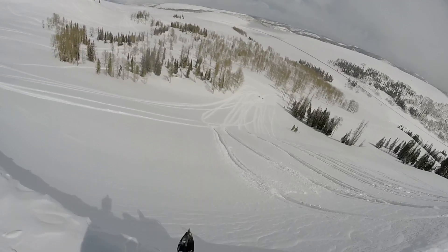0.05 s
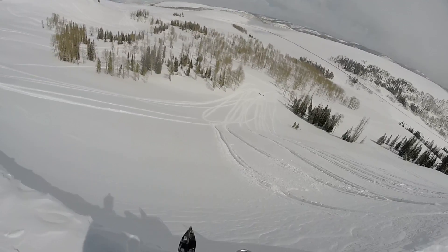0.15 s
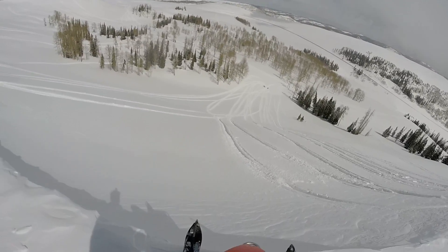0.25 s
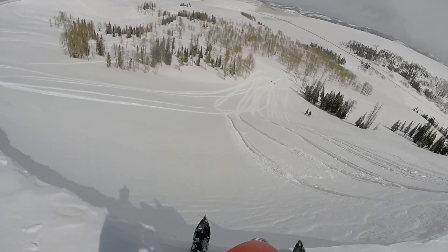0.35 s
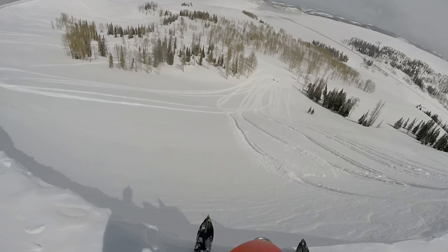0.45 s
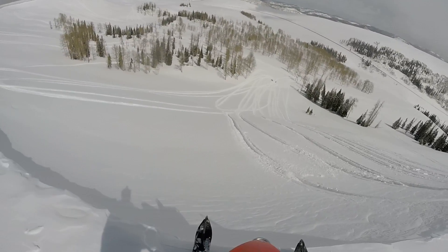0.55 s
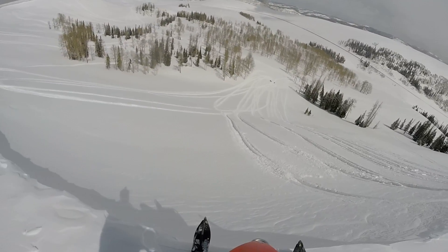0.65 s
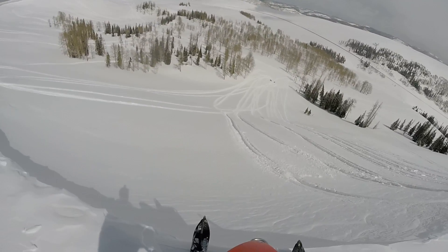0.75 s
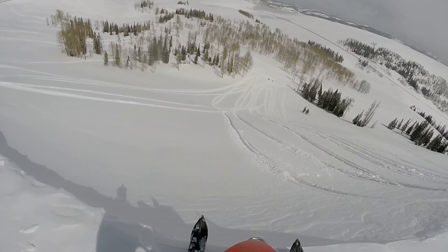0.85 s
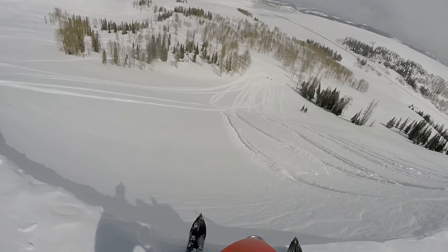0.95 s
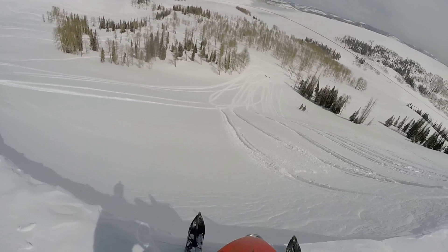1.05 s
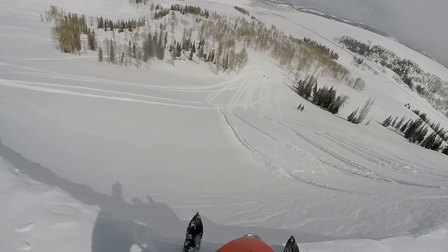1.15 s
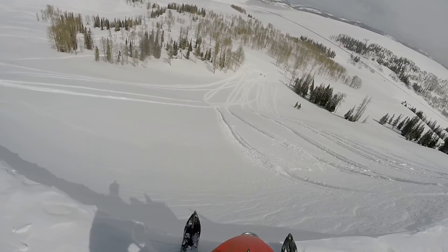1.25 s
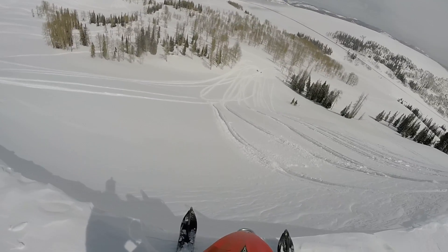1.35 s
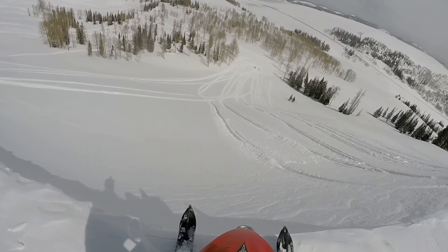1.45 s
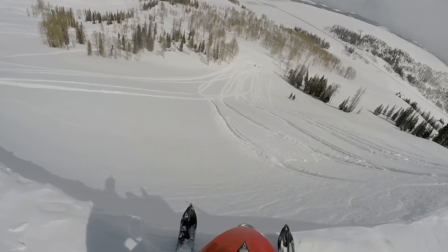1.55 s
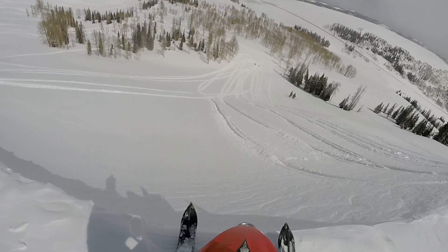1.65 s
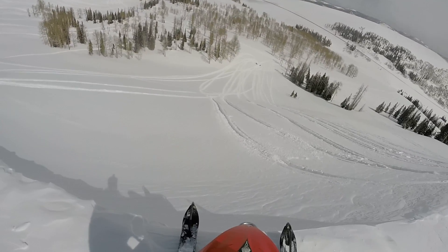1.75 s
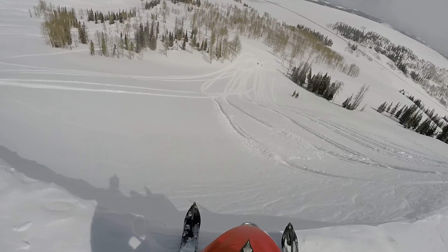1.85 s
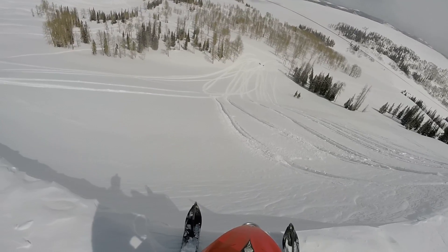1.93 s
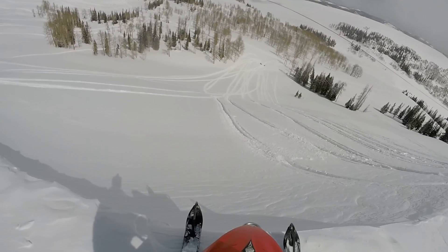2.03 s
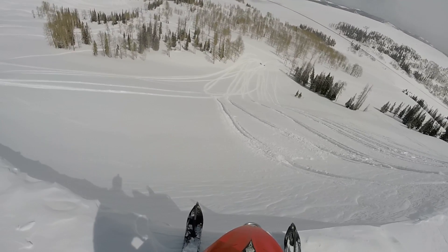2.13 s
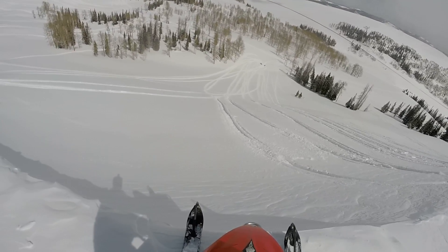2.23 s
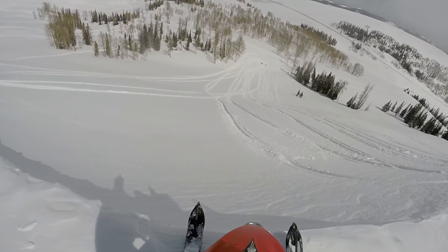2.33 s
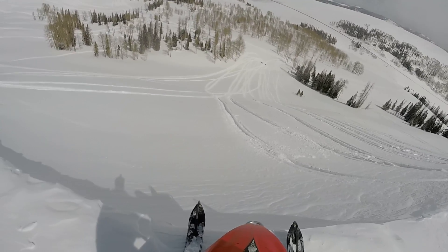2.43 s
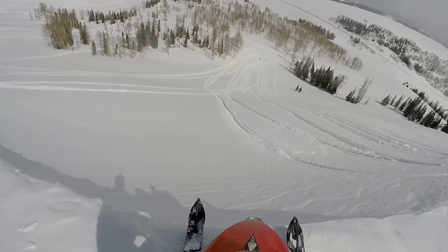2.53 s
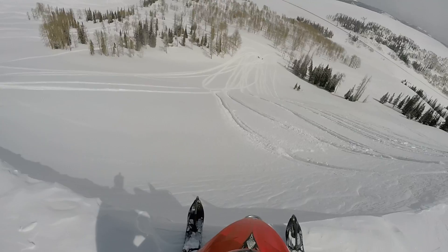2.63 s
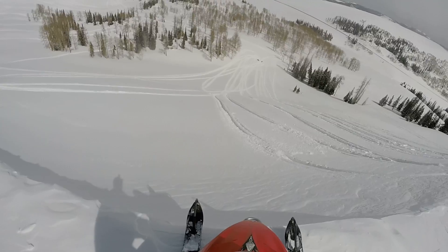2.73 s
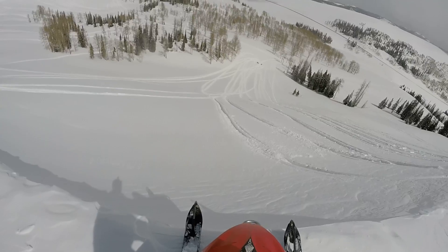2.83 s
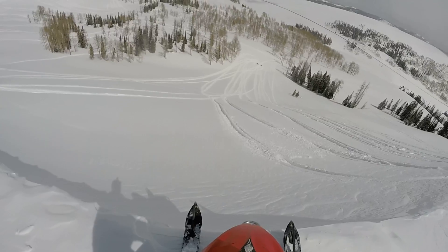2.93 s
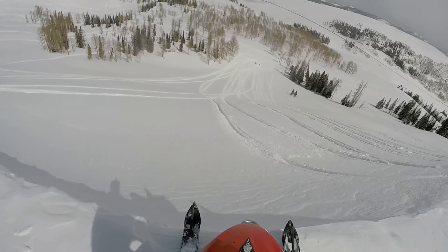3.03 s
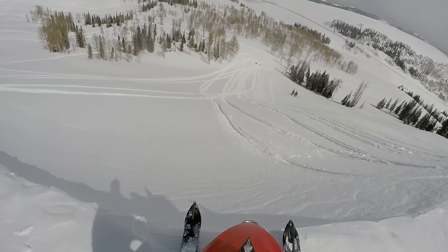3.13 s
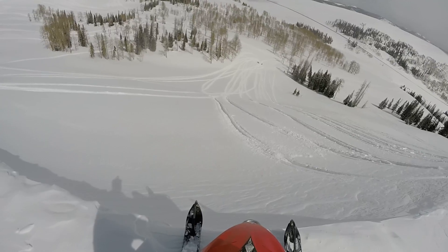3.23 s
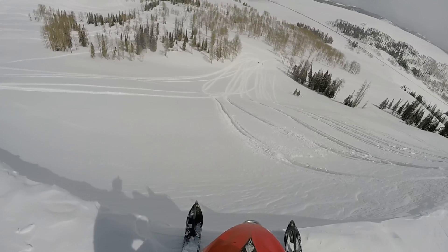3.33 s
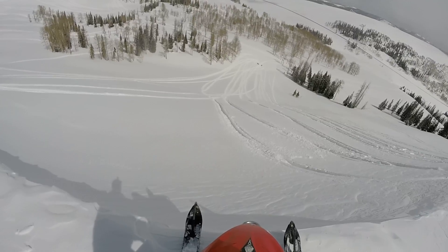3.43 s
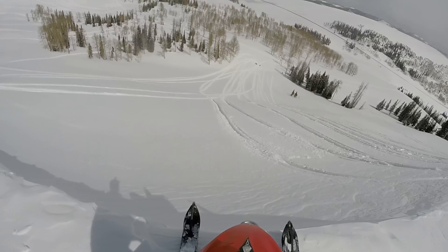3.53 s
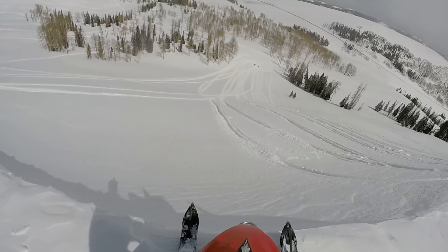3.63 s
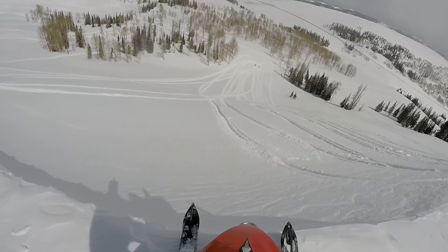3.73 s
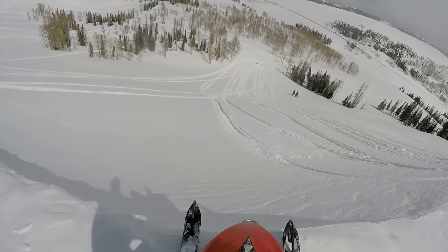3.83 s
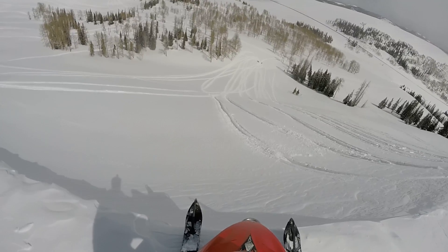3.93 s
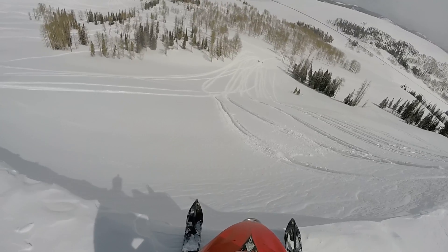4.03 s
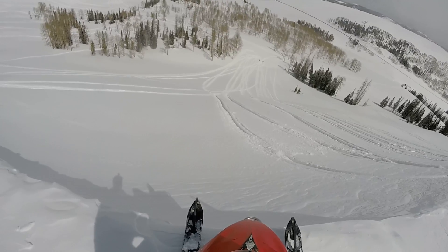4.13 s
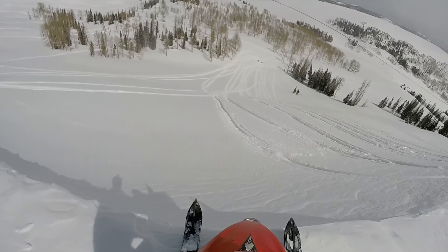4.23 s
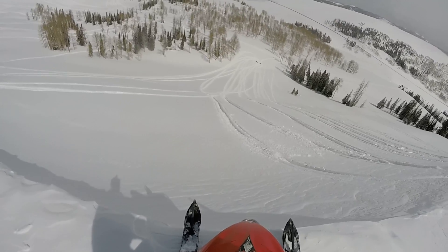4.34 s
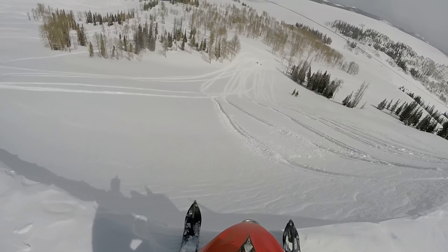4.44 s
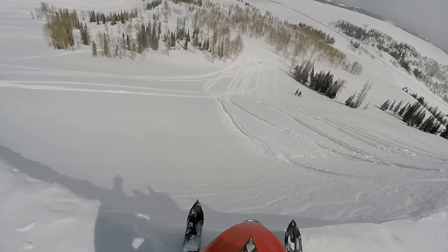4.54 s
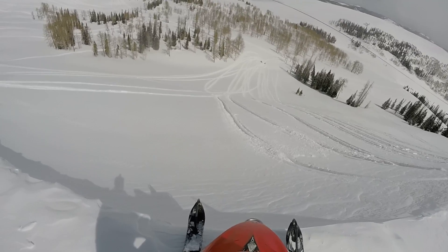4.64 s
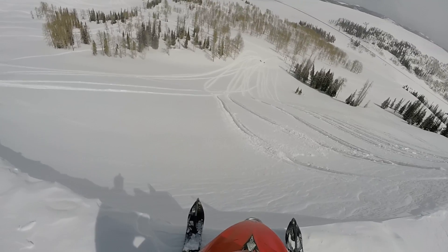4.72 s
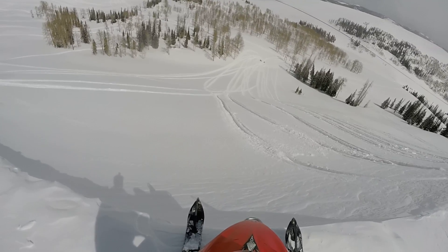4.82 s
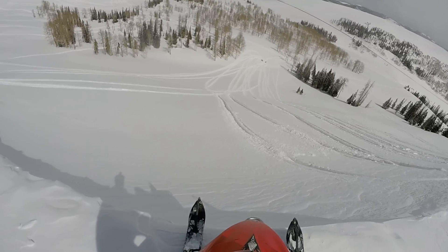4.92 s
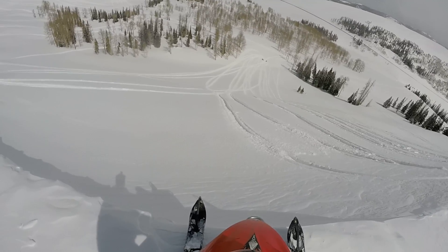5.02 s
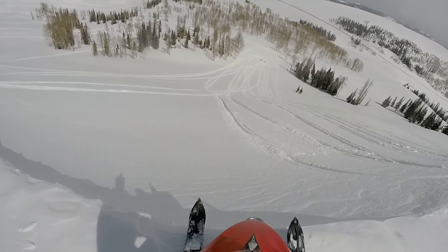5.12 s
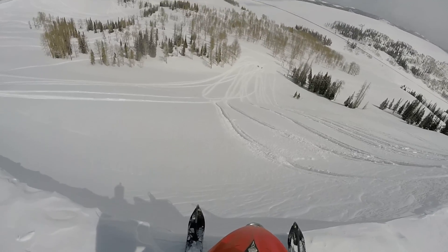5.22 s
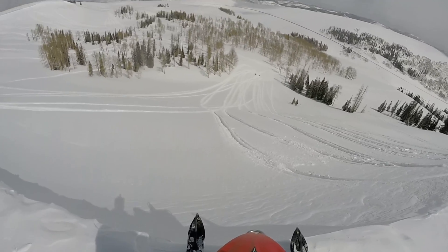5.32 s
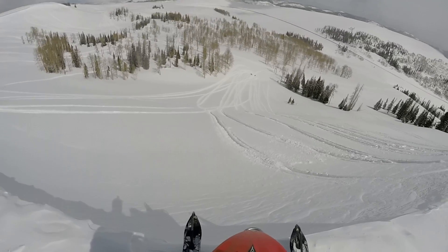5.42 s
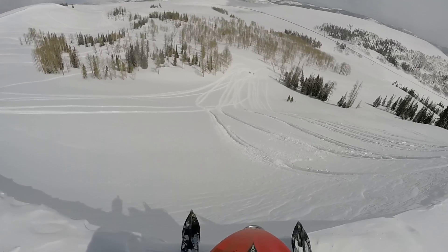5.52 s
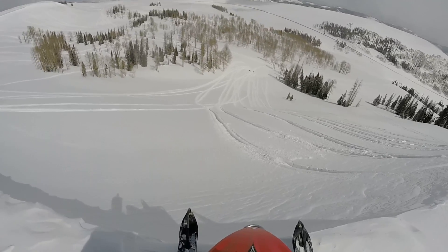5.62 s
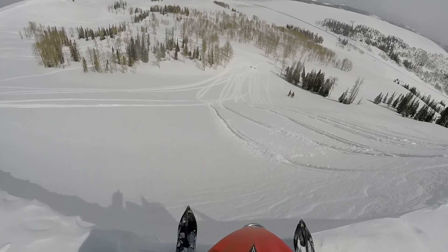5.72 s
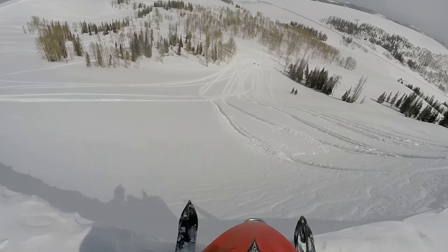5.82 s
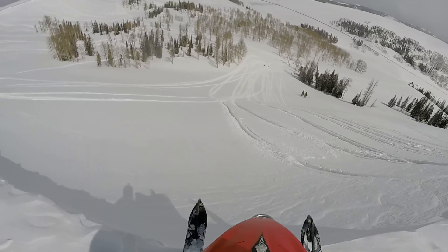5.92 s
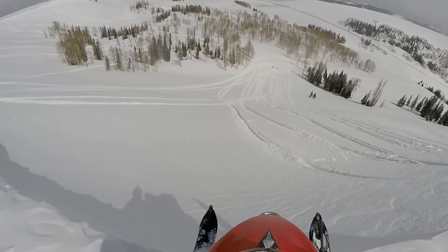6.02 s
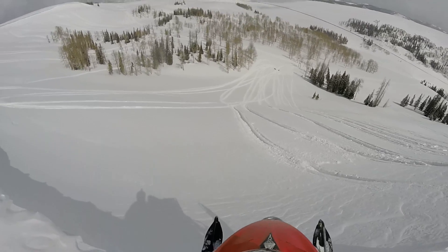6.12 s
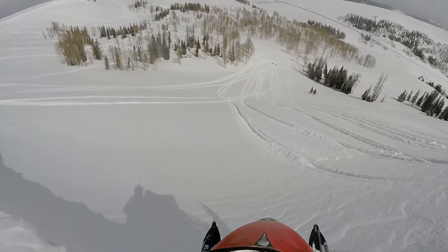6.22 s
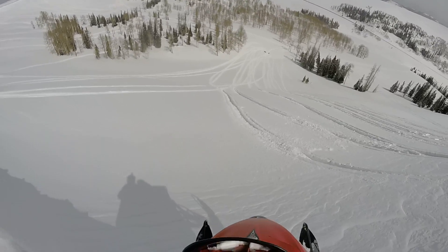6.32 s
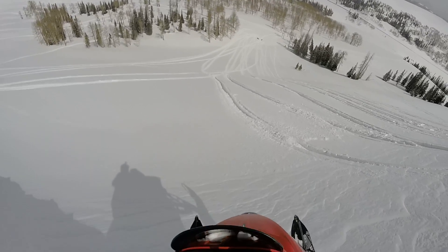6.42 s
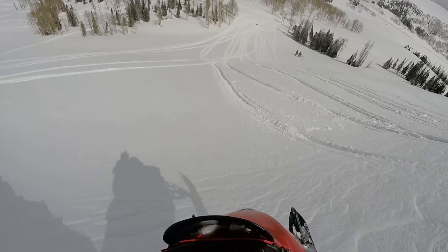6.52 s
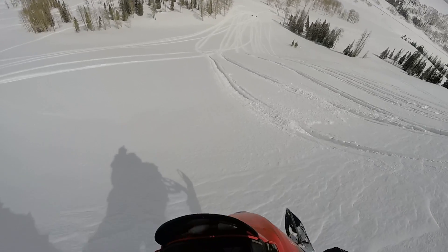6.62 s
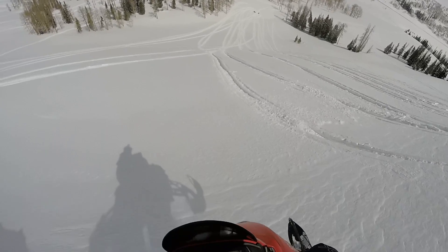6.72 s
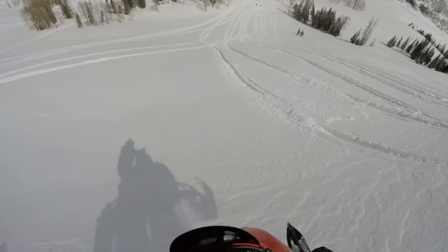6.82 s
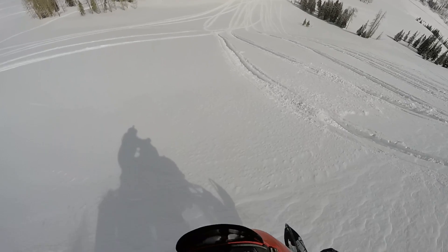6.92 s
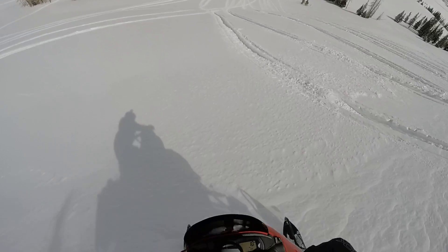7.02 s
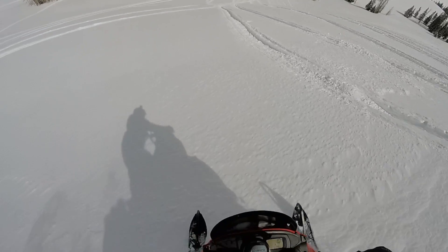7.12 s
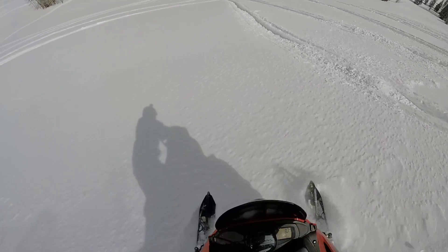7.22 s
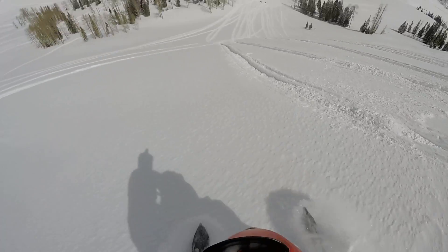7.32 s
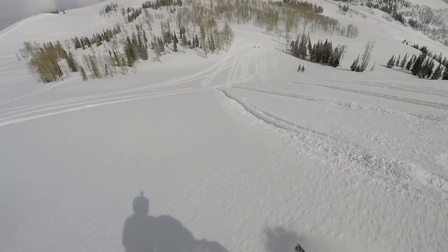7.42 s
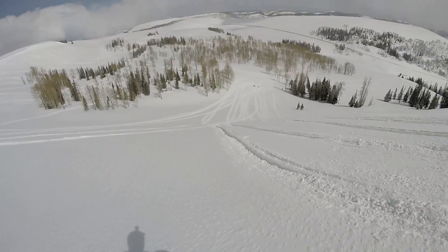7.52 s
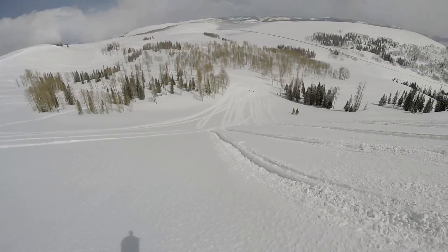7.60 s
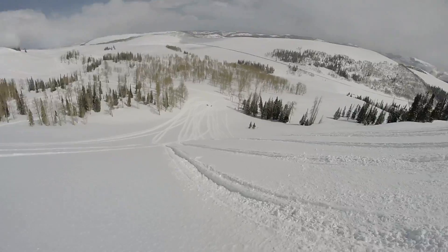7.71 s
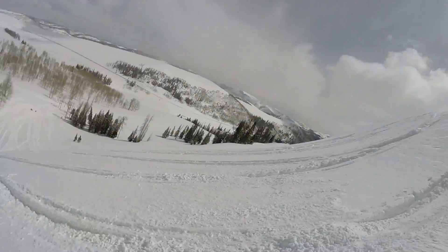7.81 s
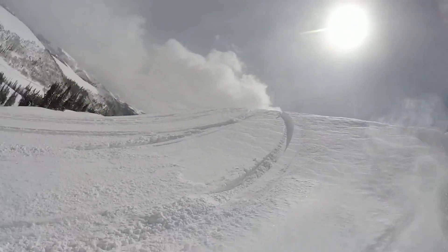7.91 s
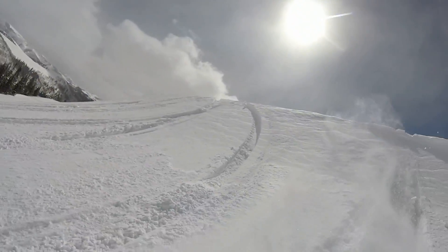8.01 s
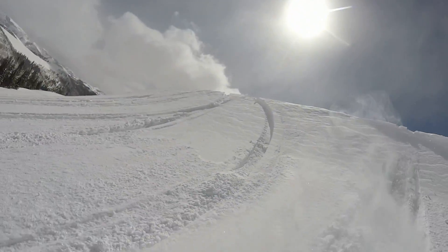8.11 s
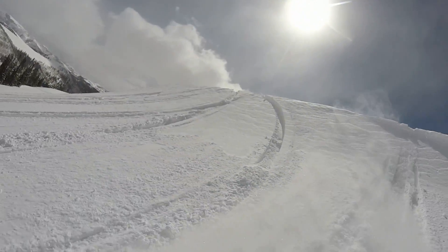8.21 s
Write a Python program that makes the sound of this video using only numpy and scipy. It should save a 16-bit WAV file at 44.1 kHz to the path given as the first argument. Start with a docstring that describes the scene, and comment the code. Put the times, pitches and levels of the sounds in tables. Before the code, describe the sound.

A snowmobile engine hunts at idle outdoors on snow, each catch barking briefly before slowing, with faint wind rumble and a few light taps. It then revs up twice into a louder, buzzing roar as wind thumps the rider's microphone. When the throttle closes, a clatter of sharp plastic knocks and rubs right at the microphone dominates, with low exhaust burble and the whir of the track beneath.

```python
"""A two-stroke snowmobile hunts at idle on a snowy slope, heard from the rider's camera: each catch
pops, barks and rasps, then friction slows the crank. Wind rumbles; the camera takes a few light taps.
From 5.3 s the machine pulls away in two main bursts of throttle, its firings booming in the pipe and
ringing the panels, while gusts buffet the microphone. At 6.8 s the throttle shuts and it coasts downhill,
exhaust burbling and track whirring, as the camera's plastic housing is shoved, knocked and rubbed."""
import sys
import numpy as np
from scipy import signal
from scipy.fft import rfft, irfft, next_fast_len
from scipy.io import wavfile
from scipy.ndimage import map_coordinates

SR = 44100
rng = np.random.default_rng(int(sys.argv[2]) if len(sys.argv) > 2 else 0)


def transcribe(signal):
    """Save signal, clipped to [-1, 1], as a 16-bit WAV file at the path in sys.argv[1]."""
    frames = np.atleast_2d(signal).T
    limited = np.clip(frames, -1, 1)
    pcm = np.round(limited * 32767).astype(np.int16)
    wavfile.write(sys.argv[1], SR, pcm)


N = 364266
T = np.arange(N) / SR


def amp(db):
    """Decibels to gain."""
    return 10 ** (np.asarray(db) / 20)


def unit(x):
    """Scale to rms 1."""
    return x / np.sqrt(np.mean(x ** 2) + 1e-20)


def steady(x):
    """Scale to rms 1 moment by moment."""
    power = signal.fftconvolve(x ** 2, np.hanning(4000) / 2000, "same")
    return x / np.sqrt(np.abs(power) + 1e-12)


def curve(rows):
    """Straight lines through (s, value) rows."""
    return np.interp(T, *np.transpose(rows))


def swells(rows):
    """A bell of gain for each (centre s, half length s, dB) row."""
    return sum(amp(db) * np.exp(-((T - s) / half) ** 2) for s, half, db in rows)


def wobble(knots_per_s):
    """A smooth random curve."""
    return map_coordinates(rng.standard_normal(int(N * knots_per_s / SR) + 4), [T * knots_per_s])


def colour(x, points, peaks=()):
    """Minimum-phase filter from (Hz, dB) points and (Hz, width Hz, dB) peaks."""
    size = next_fast_len(N + SR // 2, True) // 2 * 2
    hz = np.fft.rfftfreq(size, 1 / SR)
    point_hz, point_db = np.transpose(points)
    db = np.interp(np.log(hz + 1), np.log(point_hz + 1), point_db)
    db += sum(lift / (1 + (2 * (hz - centre) / width) ** 2) for centre, width, lift in peaks)
    cepstrum = irfft(np.log(amp(db) + 1e-6), size)
    cepstrum[1:size // 2] *= 2
    cepstrum[size // 2 + 1:] = 0
    return irfft(rfft(x, size) * np.exp(rfft(cepstrum)), size)[:N]


def noise(points, peaks=()):
    """Coloured noise of rms 1."""
    return unit(colour(rng.standard_normal(N), points, peaks))


# Catches of the idle. Each row: start in seconds, end in seconds, cap on firing rate in Hz, boost in dB.
CATCHES = [(.342, .537, 81, 5.5), (1.001, 1.054, 51, 4.5), (1.12, 1.235, 69, 4), (1.665, 1.82, 59, 5),
           (2.13, 2.41, 81, 4.8), (2.865, 3.01, 78, 4.5), (3.405, 3.65, 86, 4.8), (4.15, 4.21, 52, 2),
           (4.257, 4.36, 71, 3.8), (4.66, 4.81, 77, 3.5), (5.3, 5.4, 44, 4.5)]
# Pulling away. Each row: time in seconds, firing rate in Hz.
PULL_SPEED = [(5.45, 69.9), (5.554, 99.6), (5.694, 138.2), (5.788, 155.7), (5.88, 167.3), (5.938, 166.3),
              (6.124, 140.0), (6.198, 142.1), (6.368, 162.6), (6.442, 166.4), (6.678, 161.6), (6.76, 152.3)]
PULL_S, SHUT_S = 5.3, 6.78


def crank():
    """Firing rate in Hz and running count: catches lift the idle, friction slows it; pull; run-down."""
    pickup_hz_per_s, friction_hz_per_s, spin_on_s = 178, 71, 0.02
    rest_hz, run_down_s = 47.63, 0.58
    hunting = 66 - friction_hz_per_s * T
    for start, end, cap_hz, _ in CATCHES:
        climb = np.interp(start, T, hunting) + pickup_hz_per_s * (np.minimum(T, end + spin_on_s) - start)
        fall = friction_hz_per_s * np.maximum(T - end - spin_on_s, 0)
        hunting = np.where(T < start, hunting, np.minimum(climb, cap_hz) - fall)
    pulling = curve([(PULL_S, np.interp(PULL_S, T, hunting)), *PULL_SPEED])
    riding = rest_hz + (pulling - rest_hz) * np.exp(-np.maximum(T - SHUT_S, 0) / run_down_s)
    rate_hz = np.maximum(np.where(T < PULL_S, hunting, riding), 20)
    return rate_hz, np.cumsum(rate_hz * (1 + 0.002 * wobble(25))) / SR


def firings(cycles, rough, jitter):
    """One band-limited pulse per firing; roughness scatters strength and timing."""
    at = np.interp(np.arange(1, cycles[-1]), cycles, np.arange(N))
    uneven = rough[at.astype(int)]
    slip, surge = rng.standard_normal((len(at), 2)).T
    at = np.clip(at + jitter * SR * uneven * slip, 8, N - 10)
    taps = at.astype(int)[:, None] + np.arange(-7, 9)
    offset = taps - at[:, None]
    shape = np.sinc(offset) * np.cos(np.pi * offset / 16) ** 2
    strength = np.maximum(1 + uneven * surge, 0)
    return np.bincount(taps.ravel(), (shape * strength[:, None]).ravel(), N)


def hood(x, t60_s):
    """Dense reflections under the hood smear each pop and favour some harmonics."""
    t = np.arange(2048) / SR
    return signal.fftconvolve(x, rng.standard_normal(len(t)) * amp(-60 * t / t60_s))[:N]


# Chassis response. Each row: frequency in Hz, level in dB.
CHASSIS = [(20, -47.5), (35, -39.5), (47, -49), (70, -40), (85, -36.5), (101, -30), (120, -35),
           (145, -47.5), (175, -91)]


def chassis_shake(rate_hz, cycles, rough):
    """The crank, jolted by uneven firings, shakes the chassis at three orders of the firing rate."""
    hz, db = np.transpose(CHASSIS)
    jolted = cycles + 0.09 * rough * wobble(40)
    shake = np.zeros(N)
    for order in (0.5, 1, 2):
        level_db = np.interp(order * rate_hz, hz, db) + (0.25 + 0.73 * rough) * wobble(18)
        shake += amp(level_db) * np.cos(2 * np.pi * order * jolted)
    return shake


# Spectra of the pipe, its bark, and the bay idling and loaded. Each row: frequency in Hz, gain in dB.
PIPE = [(25, -23), (60, -18), (80, -2), (104, 4), (125, 3), (155, -3.5), (195, -15), (255, -9), (335, -10),
        (390, -20), (490, -19), (560, -51.5), (670, -19.5), (1000, -63), (5000, -94)]
BARK = [(100, -36), (170, -16), (215, 4.5), (255, 2), (320, 0), (400, -14.5), (700, -22), (2000, -55)]
BAY_IDLE = [(120, -9), (340, -2.5), (420, -12), (580, -14.5), (950, -15), (1300, -17), (2000, -18.5),
            (2900, -15.5), (4000, -25), (6000, -32.5), (9000, -37), (12000, -44.5), (14500, -50.5),
            (16000, -97)]
BAY_LOAD = [(200, 3.5), (550, -4), (1000, -7), (1600, -4), (2050, -10), (2400, -4), (3000, -5), (3900, -15),
            (5600, -24.5), (8500, -29), (12000, -39.5), (14200, -53), (15500, -91.5)]
# Hood panel resonances. Each row: centre in Hz, width in Hz, lift in dB.
PANELS = [(697, 14, 4), (1244, 140, 9), (1521, 110, 6), (1725, 254, 7.5), (2363, 110, 5), (2950, 220, 5),
          (4857, 130, 4.5), (6080, 230, 6.5)]


def idle(rate_hz, cycles):
    """Each catch pops and barks in the pipe and rasps in the bay, over the shaking chassis."""
    attack_s, release_s, settle_s, ease_db_per_s = 0.016, 0.068, 0.27, 5
    catch_db, burning, rough = np.zeros(N), np.zeros(N), np.full(N, 0.14)
    for start, end, _, boost_db in CATCHES:
        since = np.maximum(T - start, 0)
        burn = np.clip(since / attack_s, 0, 1) * np.exp(-np.maximum(T - end, 0) / release_s)
        catch_db += (boost_db + 0.53 - ease_db_per_s * since) * burn
        burning = np.maximum(burning, burn)
        rough += 0.77 * burn * np.exp(-since / settle_s)
    shake = chassis_shake(rate_hz, cycles, rough)
    pops = amp(-48 + 0.85 * catch_db) * steady(colour(firings(cycles, rough, jitter=0.00062), PIPE))
    bark_db = -49 + 0.3 * (rate_hz - 80)
    bark = burning * amp(bark_db) * steady(colour(firings(cycles, 0.5 * rough, jitter=0.0004), BARK))
    # Gas and metal noise swells once per firing and flares with uneven burning.
    gate = np.exp(-0.6 * (cycles % 1)) * amp(0.84 * rough * wobble(60))
    rasp_db = -53.5 + catch_db + 2.9 * np.log2(rate_hz / 60)
    rasp = amp(rasp_db) * unit(colour(gate * rng.standard_normal(N), BAY_IDLE, PANELS))
    smeared = hood(firings(cycles, 0.666 * rough, jitter=0.000716), t60_s=0.076)
    clatter = rough * amp(rasp_db - 2.5) * steady(colour(smeared, BAY_LOAD, PANELS))
    # A metal part sings as the firing rate nears 80 Hz.
    ring_db = -56 + np.minimum(rate_hz - 80, 0)
    ring = amp(ring_db) * wobble(130) * np.sin(2 * np.pi * 2320 * T)
    fade_out = np.clip((5.4 - T) / 0.032, 0, 1)
    return (pops + bark + rasp + clatter + ring - shake) * fade_out


# Wind spectrum. Each row: frequency in Hz, gain in dB.
BUFFET = [(10, -1.5), (28, -9.5), (60, -8), (120, -7.5), (300, -29.5), (1000, -58), (4000, -100)]
# Gusts. Each row: centre in seconds, half length in seconds, level in dB.
GUSTS = [(5.37, 0.096, -41.5), (6.045, 0.014, -25), (6.19, 0.058, -30.5), (6.55, .1, -42),
         (6.81, 0.019, -34), (7.6, 0.027, -47), (8.16, 0.037, -43)]


def wind():
    """A faint rumble on the microphone grows unsteady as the machine gathers way; gusts add to it."""
    moving = np.clip((T - 5.8) / 0.3, 0, 1)
    breeze_db = -47 + moving * (2 + 3 * wobble(7.7))
    return noise(BUFFET) * (amp(breeze_db) + swells(GUSTS))


# Knocks. Each row: start in seconds, relative level in dB, tilt in dB/octave, first rebound's drop in dB.
KNOCKS = [(.301, -35, -6.5, 14), (1.009, -41, -10, 6.5), (1.618, -34.5, -6.5, 5), (4.67, -37.5, -4.5, 3),
          (5.6776, -17.5, -7, 19), (6.785, -1.5, 3, 20.5), (6.8089, -0.5, 4, 21), (6.8207, -9.5, -2, 20),
          (6.8281, -4, -1.5, 13), (6.8563, -9.5, -.5, 5), (6.909, -18, -3, 3), (6.977, -28.5, -4, 9),
          (7.02, -4, -4, 35), (7.0722, -11, 5.5, 7.5), (7.078, -1.5, 4, 5.5), (7.0794, -2, 14, 14),
          (7.4344, -5.5, -0.5, 8.5), (7.6019, -.5, 0.5, 16), (7.6028, -4.5, 1, 24), (7.659, -24, -6, 16),
          (7.7377, -10.5, -4.5, 17), (7.7613, -13.5, -4.5, 14.5), (8.0028, -27, -7, 10),
          (8.16, -3, 0.5, 15)]


def contacts():
    """Each knock and three quickening, weakening rebounds, as (s, dB, dB/octave)."""
    flight_s, shrink, loss_db = 0.009, 0.85, 10.5
    for s, db, tilt, drop_db in KNOCKS:
        yield s, db, tilt
        for k in range(3):
            s += flight_s * shrink ** k * np.exp(0.12 * rng.standard_normal())
            yield s, db - drop_db - loss_db * k, tilt - 2


# Camera housing modes. Each row: frequency in Hz, relative level in dB, T60 in seconds.
HOUSING_MODES = [(970, -15.5, 0.018), (1410, -4, 0.02), (1786, -0.5, 0.0166), (2407, 5, 0.017),
                 (2942, 8, 0.013), (3393, 1, 0.016), (4416, 2, 0.014), (5595, -8.5, 0.022),
                 (6150, -12, 0.029), (8050, -12.5, 0.014), (10440, -12, 0.0231), (12710, -8.5, 0.02)]


def knocks():
    """Each contact cracks and briefly rings the plastic housing, its modes scattered afresh."""
    out = np.zeros(N + SR)
    t = np.arange(4096) / SR
    octaves = np.log2(np.maximum(np.fft.rfftfreq(len(t), 1 / SR), 500) / 3000)
    hz, mode_db, t60_s = np.transpose(HOUSING_MODES)[:, :, None]
    for s, db, tilt in contacts():
        strength, detune, phase = rng.standard_normal((3, len(hz), 1))
        decay = amp(mode_db + 2.2 * strength - 60 * t / t60_s)
        ring = decay * np.sin(2 * np.pi * (hz * (1 + 0.0716 * detune) * t + phase))
        crack = rng.standard_normal(len(t)) * (amp(1.5 - 60 * t / 0.0063) + amp(-24 - 60 * t / 0.033))
        crack = signal.lfilter([1], [1, -0.45], crack)
        hit = irfft(rfft(np.roll(ring.sum(0) + crack, 8)) * amp(tilt * octaves))
        out[round(s * SR):][:len(t)] += amp(db + 12.5) * hit / np.linalg.norm(hit)
    tone = [(60, -6.5), (600, -4), (1300, 4.5), (7500, -1), (12500, -14.5), (15800, -30.5)]
    return colour(out[:N], tone)


# Throttle bursts. Each row: opening, peak and shutting times in seconds, relative level in dB.
BURSTS = [(5.28, 5.73, 5.955, 0), (6.005, 6.03, 6.045, -13), (6.13, 6.25, 6.77, -.7)]


def throttle():
    """Opening 0-1 and exhaust level in dB: each burst swells, sags under load and drops when shut."""
    open_s, close_s = 0.025, 0.01
    shut_db, peak_db, swell_db_per_s, sag_db_per_s = -44, -23.5, 53.5, 32
    opening, exhaust = np.zeros(N), np.full(N, amp(shut_db))
    for start, peak, shut, db in BURSTS:
        held = np.clip((T - start) / open_s, 0, 1) * np.exp(-np.maximum(T - shut, 0) / close_s)
        drop_db = np.maximum(swell_db_per_s * (peak - T), sag_db_per_s * (T - peak))
        opening = np.maximum(opening, held)
        exhaust = np.hypot(exhaust, held * amp(peak_db + db - drop_db))
    return opening, 20 * np.log10(exhaust)


# Spectra of the panels under load and the coasting pipe. Each row: frequency in Hz, gain in dB.
ROAR = [(380, -25), (500, -12), (690, -4), (850, -4), (1000, -8), (1150, 0), (1380, -6), (1700, 1),
        (2050, -8), (2400, -2), (3000, -6), (4500, -28), (12000, -68)]
BURBLE = [(30, -24), (75, -13), (103, 2), (135, -12), (200, -18), (300, -18), (350, -11), (420, -25),
          (800, -52), (2500, -100)]
# Coughs while coasting. Each row: centre in seconds, half length in seconds, level in dB.
COUGHS = [(7.95, 0.0332, -32.5), (8.035, 0.027, -32), (8.115, 0.028, -32)]


def driving(rate_hz, cycles):
    """Under throttle, firings boom in the pipe, ring the panels and rasp in the bay; then they burble."""
    opening, exhaust_db = throttle()
    even_above_db, stumble_range_db = -29, 14
    rough = 0.02 + 0.85 * np.clip((even_above_db - exhaust_db) / stumble_range_db, 0, 1) ** 2
    pulses = firings(cycles, rough, jitter=0.00034)
    exhaust = -amp(exhaust_db) * steady(colour(pulses, PIPE))
    roar = steady(colour(unit(pulses) + unit(hood(pulses, t60_s=0.1)), ROAR))
    gate = np.exp(-0.9 * (cycles % 1))
    rasp = unit(colour(gate * rng.standard_normal(N), BAY_LOAD, PANELS))
    # With speed, the bay gets louder and more of its noise locks to the firings.
    bay_db = -32 + 0.14 * (rate_hz - 166.6) - 2 * (1 - opening)
    locked = 0.36 * np.clip(rate_hz / 70 - 1, 0, 1)
    bay = amp(bay_db) * (np.sqrt(locked) * roar + np.sqrt(1 - locked) * rasp)
    # Throttle shut: stray firings ring only the pipe's lowest resonances.
    burble_gain = amp(-50 + 3 * wobble(18)) + swells(COUGHS)
    burble = burble_gain * steady(colour(pulses, BURBLE, peaks=[(105, 14, 12.6)]))
    fade_in = np.clip((T - 5.27) / 0.15, 0, 1)
    coasting = np.clip((T - SHUT_S) / 0.054, 0, 1)
    return (1 - coasting) * (exhaust + bay) * fade_in + coasting * burble


# Rubs. Each row: centre in seconds, half length in seconds, level in dB.
RUBS = [(6.06, 0.022, -27), (6.47, 0.016, -29.5), (6.996, .013, -37), (7.582, 0.0071, -29.5),
        (7.752, 0.0057, -30.5), (8.141, 0.0068, -37), (8.154, 0.0038, -24.5)]
# Rub spectrum. Each row: frequency in Hz, gain in dB.
RUB_SPECTRUM = [(200, -49), (800, -0.5), (1500, 2.5), (3000, 8), (4500, -15), (7000, -21.5), (13000, -38.5),
                (16000, -69.5)]


def rubs():
    """Short gritty scrapes over the housing."""
    return swells(RUBS) * unit(noise(RUB_SPECTRUM) * amp(0.98 * wobble(500)))


# Soft shoves. Each row: centre in seconds, level in dB.
SHOVES = [(6.776, -25.5), (7.071, -25.5), (7.573, -30)]


def shoves():
    """A push on the camera gives one slow swing of pressure."""
    return sum(amp(db) * 2 * (T - s) / 0.0094 * np.exp(-((T - s) / 0.01) ** 2) for s, db in SHOVES)


# Track spectrum. Each row: frequency in Hz, gain in dB.
TRACK_SPECTRUM = [(150, -34.5), (250, -14.5), (352, 3), (440, -14), (675, -18), (844, -14), (1560, -4.5),
                  (1760, -13.5), (2950, -0.5), (3880, -23), (7060, -38.5), (8100, -45.5), (15000, -83)]
# Track sheen. Each row: centre in Hz, width in Hz, lift in dB.
TRACK_PEAKS = [(5500, 500, 2), (10000, 1000, 8.5)]
# Track loudness. Each row: time in seconds, level in dB.
TRACK_LEVEL = [(6.88, -50.5), (7.2, -48), (7.55, -45.5), (7.92, -44.5), (8.04, -49.5), (8.26, -54)]


def track():
    """The coasting track hisses and rattles on the snow, its whine sinking as it slows."""
    hiss = noise(TRACK_SPECTRUM, TRACK_PEAKS) * amp(2 * wobble(35))
    slowed_s = np.cumsum(1 - 0.076 * np.clip(T - 6.9, 0, 2)) / SR
    whine = sum(wobble(220) * np.sin(2 * np.pi * hz * slowed_s) for hz in (2900, 3070, 3250))
    rattle = noise([(200, -2.5), (700, -3), (1500, 1.5), (2500, 0), (5000, -16), (14000, -43)])
    rattle *= unit(amp(4 * wobble(45)))
    fade_in = np.clip((T - SHUT_S) / 0.049, 0, 1)
    return fade_in * amp(curve(TRACK_LEVEL)) * (hiss + amp(-10.5) * unit(whine) + amp(-4.5) * rattle)


def scene():
    """Mono sum at the camera; one crank drives both idle and ride."""
    rate_hz, cycles = crank()
    engine = idle(rate_hz, cycles) + driving(rate_hz, cycles)
    return (engine + track() + knocks() + rubs() + shoves() + wind())[None]


def record(dry):
    """Clip at full scale, then cut the top of the treble."""
    top_hz = 16100
    size = next_fast_len(N + SR // 2)
    passband = np.fft.rfftfreq(size, 1 / SR) < top_hz
    return irfft(rfft(np.clip(dry, -1, 1), size) * passband, size)[:, :N]


dry = scene()
out = record(dry)
transcribe(out)
```